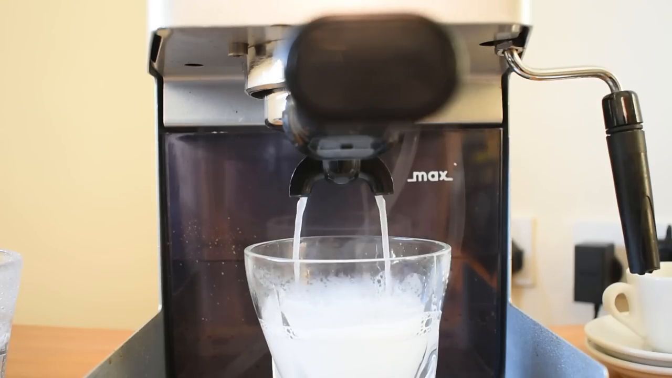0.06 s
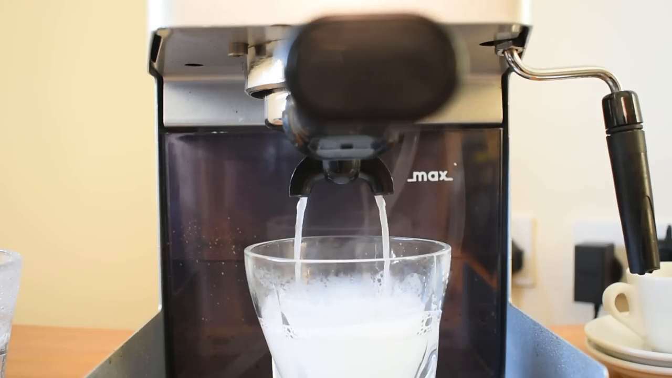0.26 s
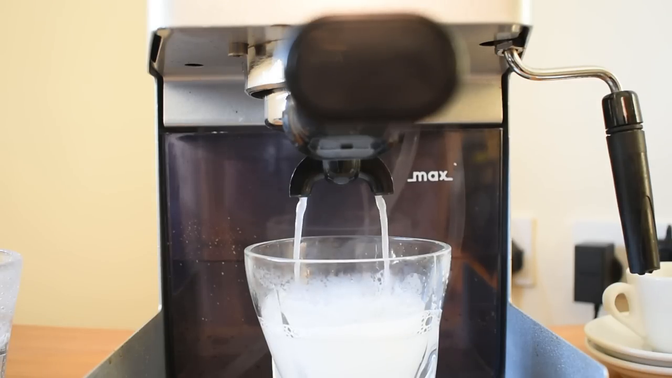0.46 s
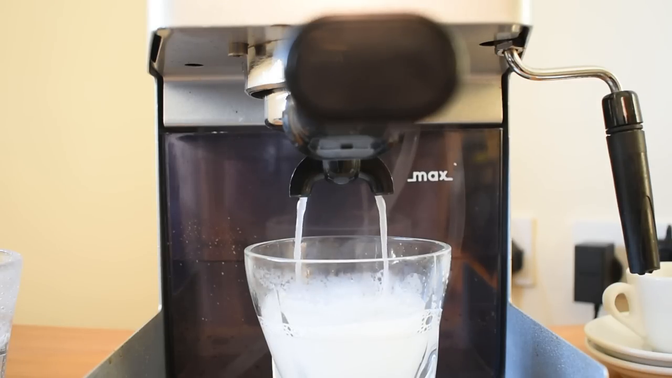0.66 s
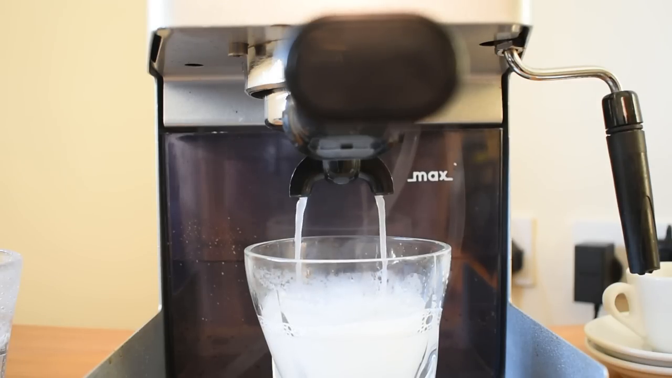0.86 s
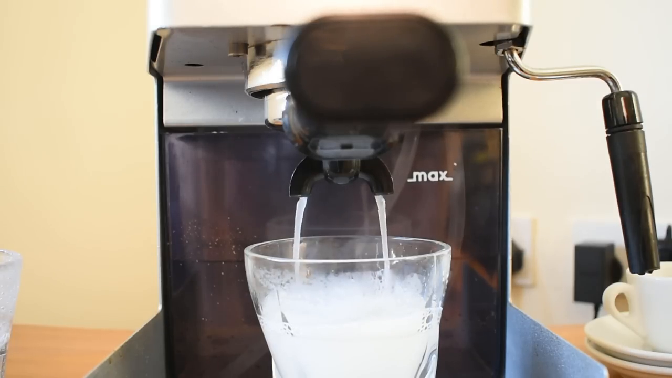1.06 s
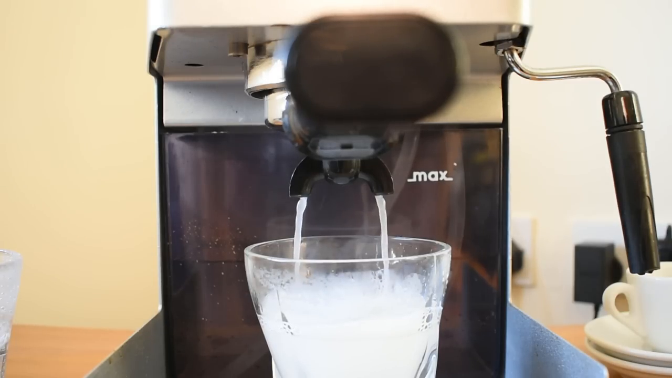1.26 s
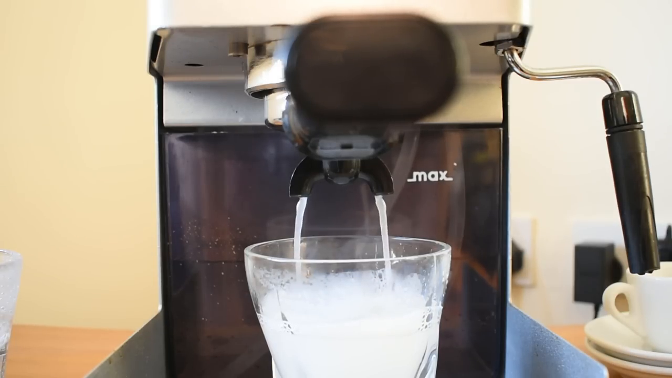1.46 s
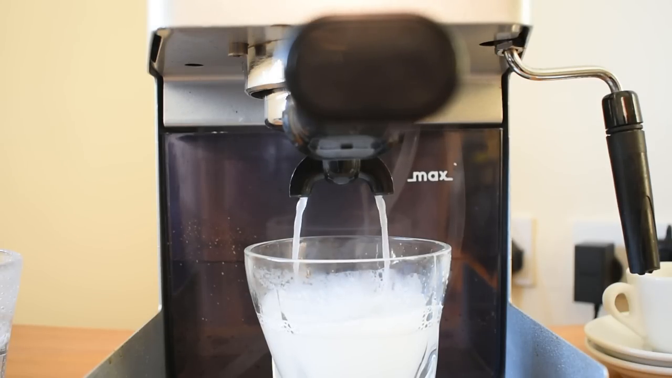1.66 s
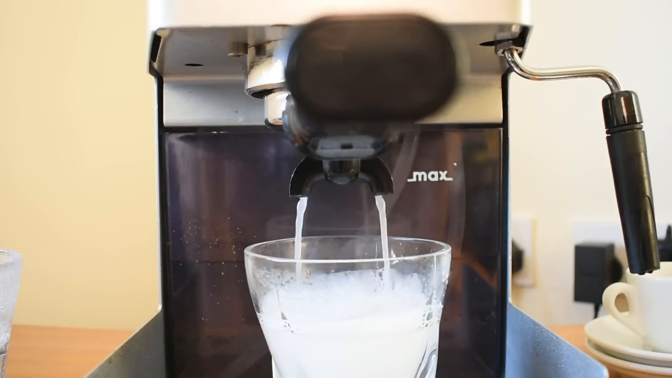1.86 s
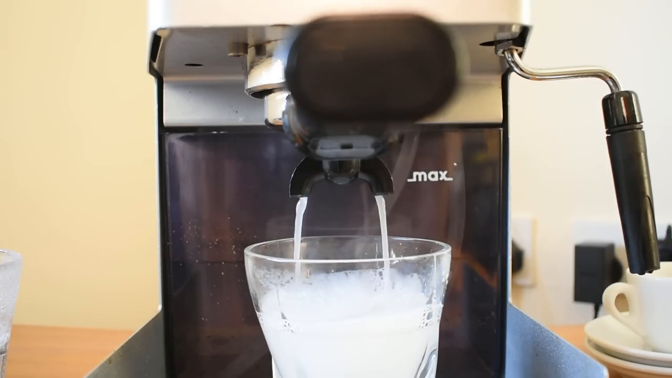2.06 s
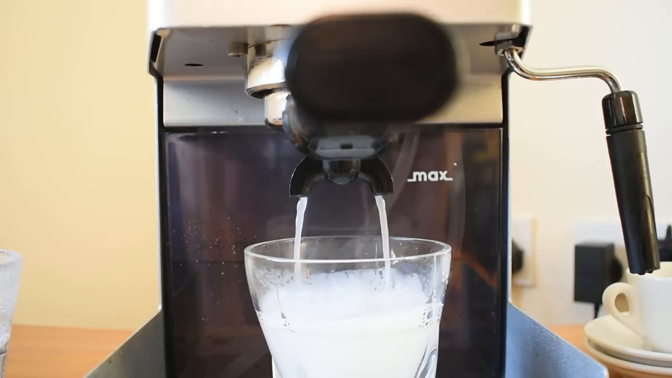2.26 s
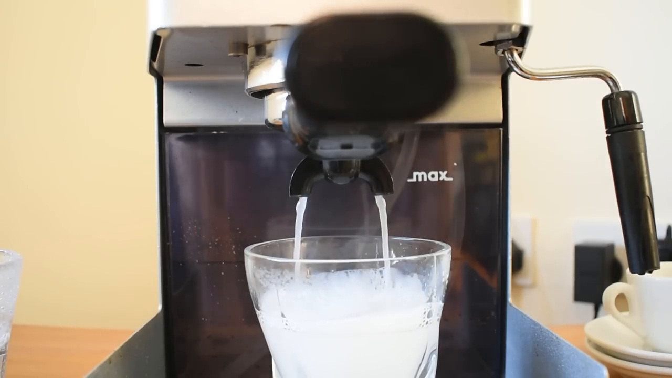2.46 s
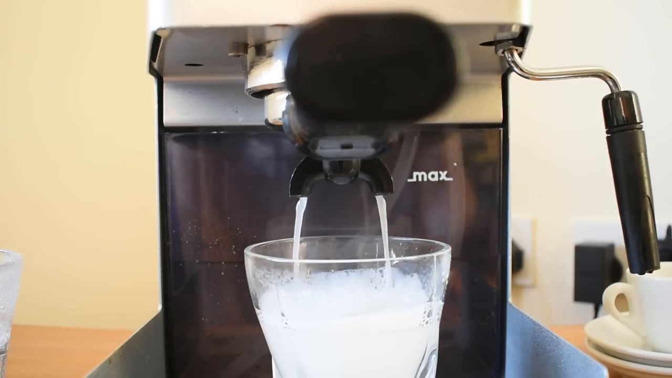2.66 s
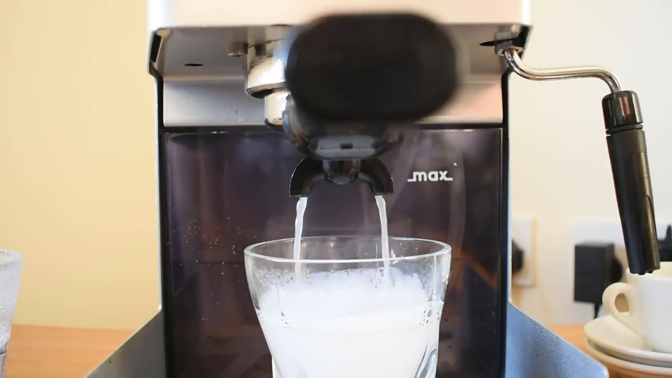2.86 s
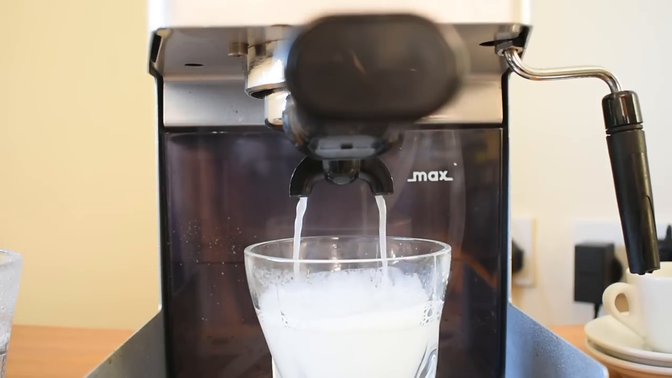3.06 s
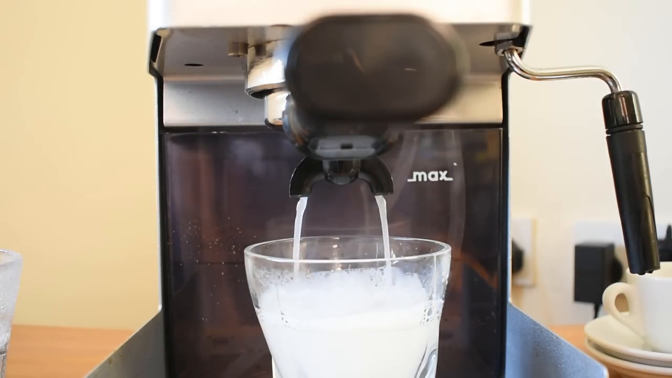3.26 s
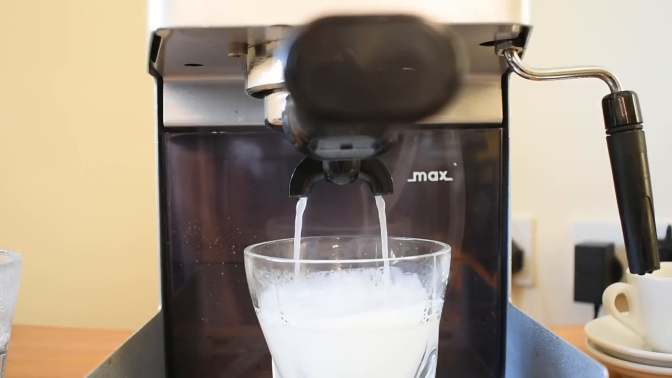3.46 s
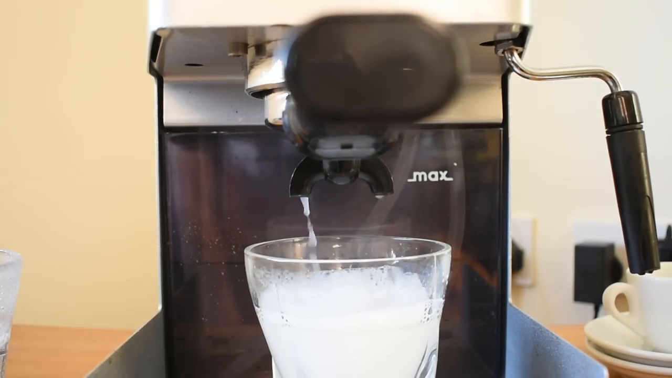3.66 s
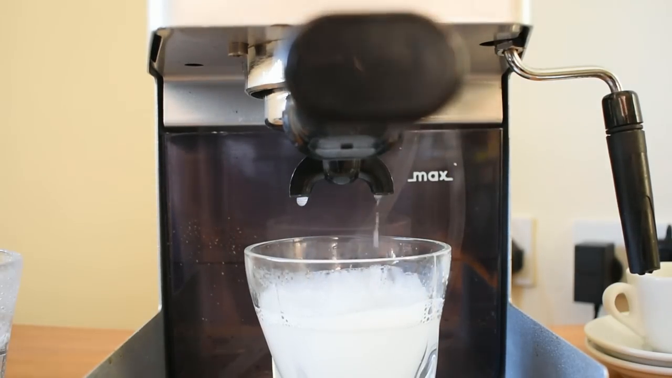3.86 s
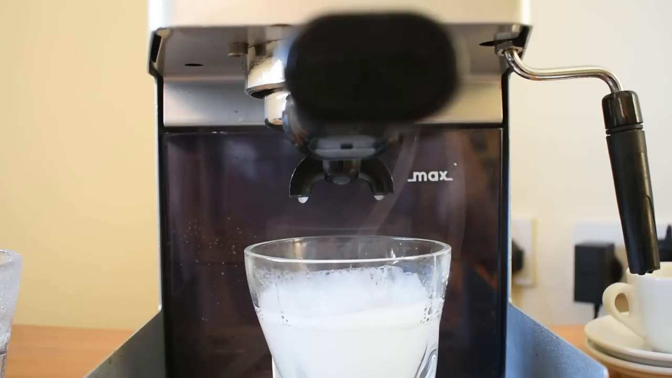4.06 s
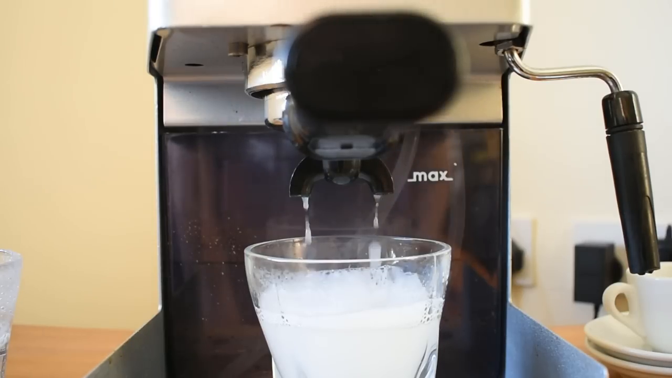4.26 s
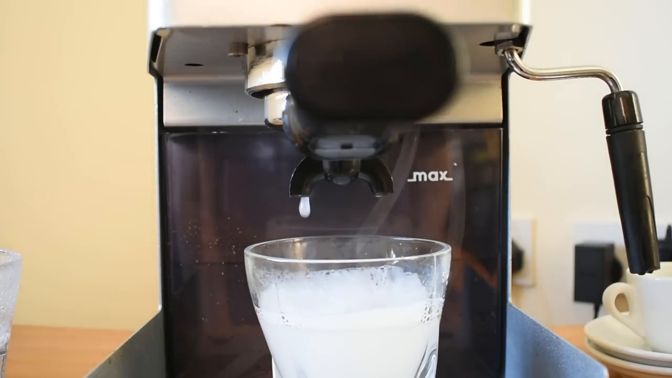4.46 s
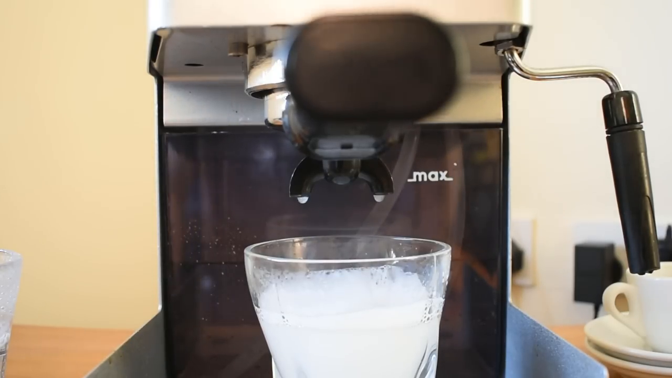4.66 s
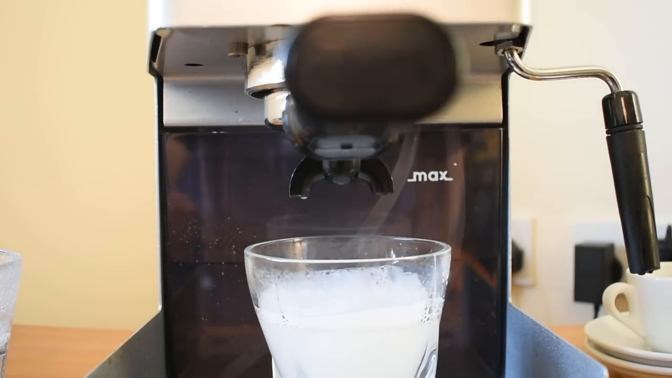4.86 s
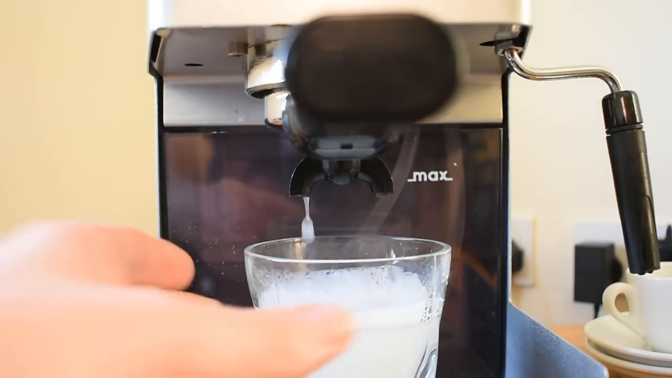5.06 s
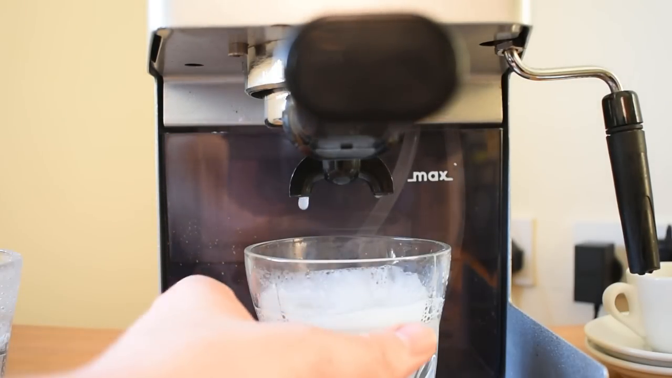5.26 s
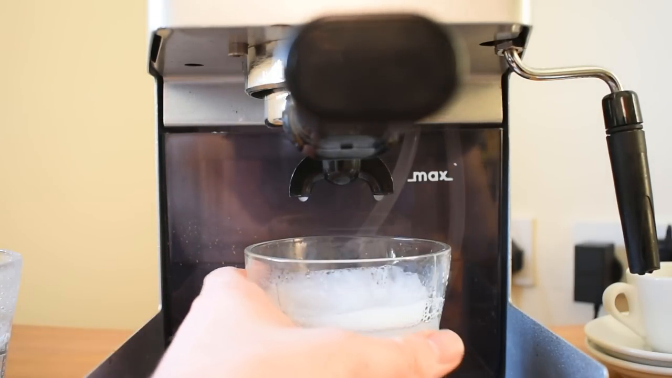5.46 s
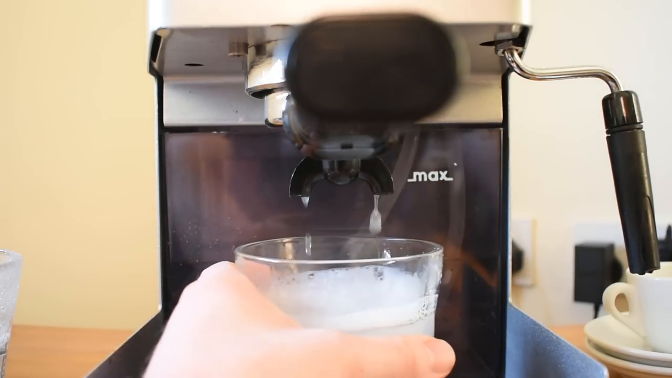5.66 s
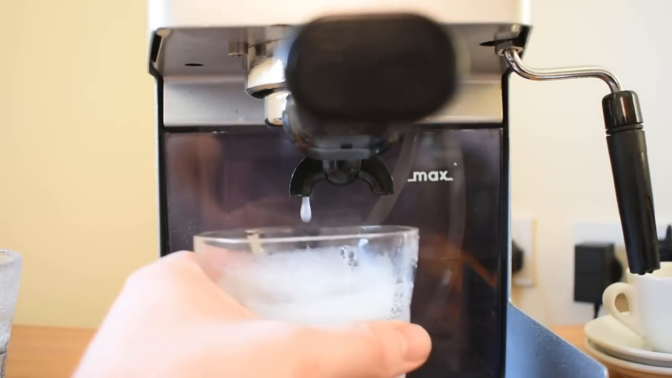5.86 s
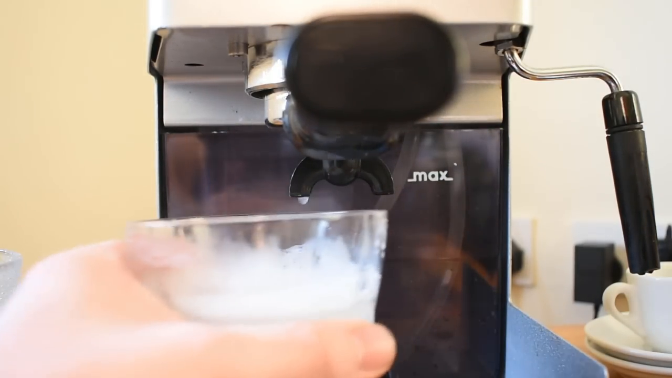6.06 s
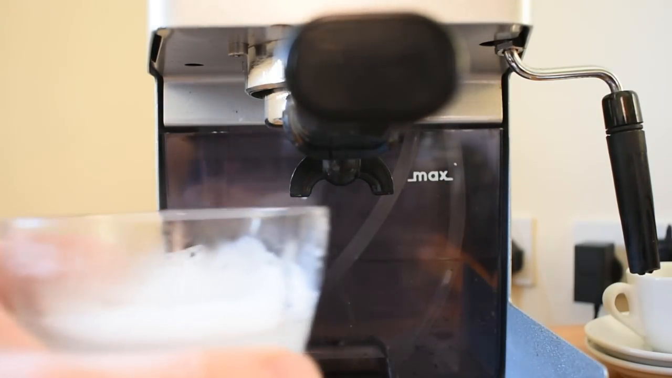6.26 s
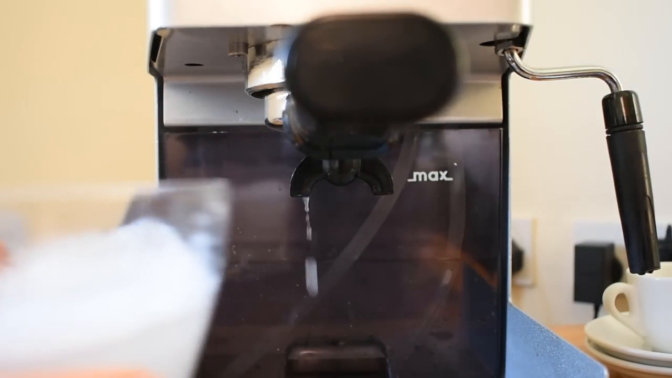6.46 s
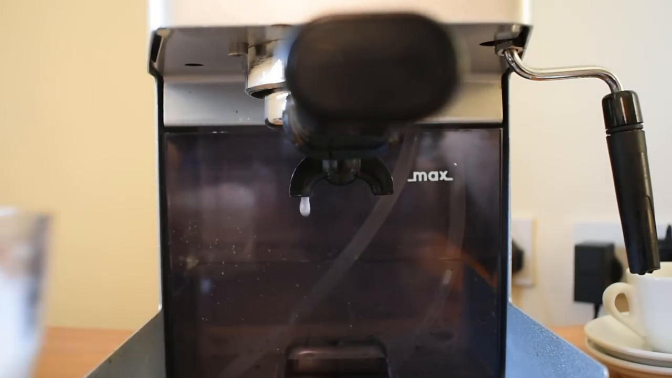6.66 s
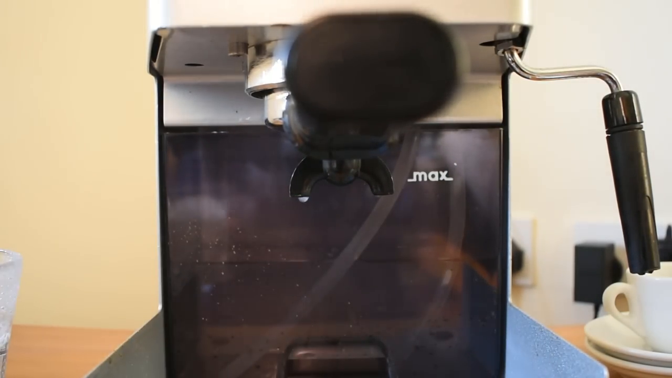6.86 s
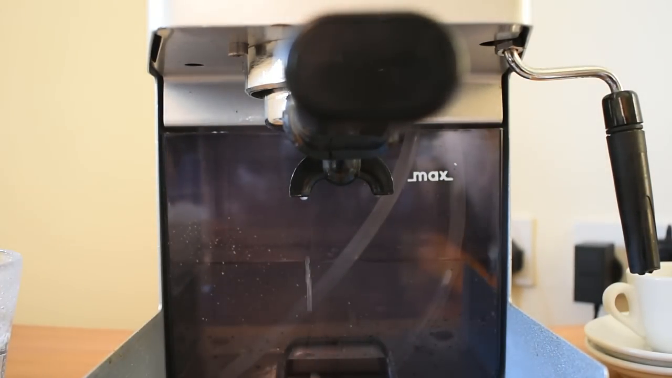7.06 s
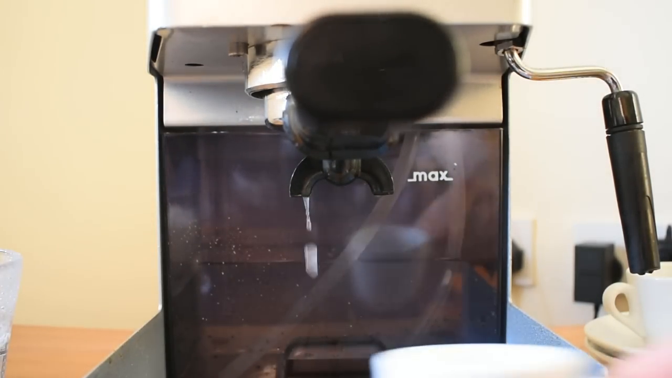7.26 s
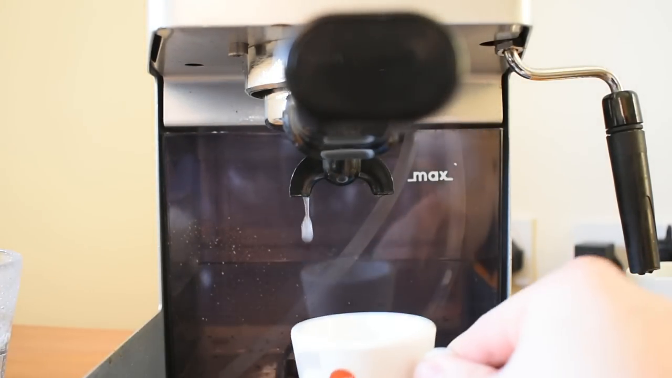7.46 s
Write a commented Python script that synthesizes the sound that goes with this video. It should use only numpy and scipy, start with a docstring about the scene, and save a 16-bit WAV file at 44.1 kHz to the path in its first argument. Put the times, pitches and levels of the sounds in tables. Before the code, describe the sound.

An espresso machine's pump runs close by in a kitchen, a steady buzz with a rattling housing and a bright, grainy hiss. About halfway through, a loud switch snap cuts it off and the room rings briefly. Over a quiet hum the spout spits once, a glass is lifted and set down with soft thuds and scrapes, and a cup ticks twice against the tray.

```python
"""An espresso machine's vibrating pump buzzes at mains rate; each piston stroke rattles the housing and sprays
a hiss. A switch snaps it off and the kitchen rings briefly. Over a quiet hum a drop falls into foam once, a
glass is lifted from the drip tray and set down on the worktop with thuds and scrapes, and a cup is brought in
with two ticks."""
import sys
import numpy as np
from scipy import signal
from scipy.fft import rfft
from scipy.io import wavfile
from scipy.ndimage import uniform_filter1d

SR = 44100
rng = np.random.default_rng(int(sys.argv[2]) if len(sys.argv) > 2 else 0)


def waveform_to_disk(signal):
    """Save audio, clipped to [-1, 1], as 16-bit WAV at the path in sys.argv[1]."""
    frames = np.transpose(np.atleast_2d(signal))
    scaled = np.clip(frames, -1, 1) * 32767
    samples = np.round(scaled).astype(np.int16)
    wavfile.write(sys.argv[1], SR, samples)


N = 331191
TIME_S = np.arange(N) / SR
MAINS_HZ, PUMP_STOP_S = 49.92, 3.5

# room air: freq_hz, gain_db
AIR_SPECTRUM = [(20, -20), (40, -10.5), (62, 0), (130, -6.5), (180, -1), (240, -6.5), (320, -3), (420, -9),
                (560, -9.5), (720, -7), (950, -8.5), (1400, -13.5), (3000, -18), (6000, -22.5),
                (10000, -26), (15700, -33)]
# mains hum: freq_hz, level_db
HUM_PARTIALS = [(100, -67.5), (200, -64)]
# kitchen reverberation: freq_hz, t60_s
KITCHEN_DECAY = [(100, 1), (400, 0.38), (1500, 0.4), (4500, 0.41), (9000, .3), (15000, 0.22)]
# wet pops: freq_hz, gain_db
POP_SPECTRUM = [(400, -12), (1200, 1), (5000, 3), (10000, -2), (15000, -7)]
# glass bumping tray and worktop: start_s, gain_db, hand_damping_t60_s
GLASS_KNOCKS = [(5.549, -44.5, .1), (5.766, -42, .1), (6.218, -48, .04), (6.338, -49, .04),
                (6.970, -39, .15), (7.046, -34.5, .8)]
# worktop under the glass: freq_hz, gain_db, t60_s
WORKTOP_MODES = [(100, -7, .15), (176, -17, 0.14), (290, -9, 0.079), (331.4, 0.5, 0.19), (378, -9, 0.071),
                 (430, -9, 0.092), (785, -17, 0.046), (895, -13, .06)]
# dull puff of a bump: freq_hz, gain_db
PUFF_SPECTRUM = [(60, -6), (400, 12), (950, 9), (2000, -8), (8000, -22)]
# glass sliding: stop_s, peak_db, length_s
GLASS_SLIDES = [(5.535, -63, .04), (5.767, -47.5, .04), (6.23, -58, .05), (7.060, -36, .048)]
# friction of its base: freq_hz, gain_db
SCRAPE_SPECTRUM = [(240, -35), (400, 2), (621, -17), (734, 0), (816, -10), (907, 2.5), (1210, -11.5),
                   (2470, -8.5), (3390, -14), (5600, -17.5), (15000, -39)]
# cup touched, then meeting the tray: start_s, gain_db
CUP_CONTACTS = [(7.461, -46), (7.502, -44)]
# cup ring: freq_hz, gain_db, t60_s
CUP_MODES = [(307, 0.5, 0.044), (1260, 3.5, 0.018), (2350, -5.5, .04), (5100, -5, 0.028), (11800, -7, .04)]
# switch snap: freq_hz, gain_db
SNAP_SPECTRUM = [(30, -45), (80, -28), (320, -9.5), (560, -7), (720, -15.5), (1000, -8), (1330, -1),
                 (1580, -10), (1850, -0.5), (2200, -4), (2780, 2), (3300, -9.5), (4300, -0.5), (5800, -4.5),
                 (8000, -8), (15700, -18)]
# bright edge of its hardest contact: freq_hz, gain_db
SLAM_SPECTRUM = [(50, -38), (500, -15), (4500, -0.5), (9000, -5), (14000, -2.5)]
# metal rung by that contact: freq_hz, gain_db, t60_s
SLAM_MODES = [(320, 2, 0.25), (548, -1, .35), (1401, -3, .2), (1900, -3, 0.2), (2043, -11.5, .15),
              (2850, -12.5, .18), (4500, -16.5, .2), (5890, -10.5, .12)]
# pump hiss: freq_hz, gain_db
HISS_SPECTRUM = [(1000, -31.5), (1500, -13.5), (1850, -2.5), (2200, -8.5), (2800, -11), (3300, -8),
                 (3600, -10), (5000, -9), (6500, -5), (8500, -5), (10500, -6), (12500, -7.5), (14500, -7.5),
                 (15700, -11.5)]
# thin metal ringing in the hiss: freq_hz, width_hz, gain_db
METAL_RESONANCES = [(2210, 90, -1.5), (3475, 79, -2), (3710, 50, 1), (4105, 63, -0.5), (4790, 100, -6),
                    (5080, 42, 0.5), (5830, 110, -3), (6320, 99, 0.5), (6950, 98, -1.5), (7410, 60, 2.5),
                    (8000, 110, -0.5), (9000, 57, 4.5), (9230, 100, 1), (9610, 90, -1), (10100, 110, -7.5),
                    (13300, 150, -5.5), (13880, 79, -4.5), (14700, 61, -10)]
# panel rattle: freq_hz, gain_db
RATTLE_SPECTRUM = [(30, -36.5), (70, -25), (120, -18.5), (250, -22), (450, -17), (800, -31.5), (1150, -17),
                   (1400, -20.5), (1650, -24), (2600, -38)]
# housing: freq_hz, width_hz, gain_db
HOUSING_RESONANCES = [(101, 21, -16), (166.3, 12, -13.5), (235, 20, -14), (284.5, 14, 1), (305.4, 28, 3),
                      (398, 50, -9.5), (470, 33, -14.5), (620, 140, -14.5), (723, 45, -14.5),
                      (825, 25, -13.5), (945, 45, -11.5), (1100, 14, -15), (1254, 45, -18), (1378, 46, -9),
                      (1481, 67, -17.5)]
# pump buzz: stroke_rate_multiple, level_db
BUZZ_HARMONICS = [(1, -53.5), (2, -47.5), (3, -48.5), (4, -39.5), (5, -51.5), (6, -38), (7, -49.5),
                  (8, -51.5), (9, -50.5), (10, -47), (12, -48), (13, -50.5), (14, -50.5), (15, -54),
                  (18, -54.5), (19, -53.5), (20, -54.5), (21, -60), (22, -52), (24, -50), (26, -55),
                  (27, -40), (29, -47.3), (30, -60), (31, -56)]
# its faint upper harmonics: freq_hz, gain_db
BUZZ_TOP_SPECTRUM = [(1600, -7), (1850, -8), (2200, 6), (2400, 1.5), (2520, 6.5), (2700, -9), (3300, -13),
                     (3480, -4.5), (4150, -6.5), (4500, -9), (6000, -25)]


def amp(db):
    """Decibels to amplitude."""
    return 10 ** (np.asarray(db) / 20)


def unit_rms(x):
    """Scale to rms 1."""
    return x / np.sqrt(np.mean(x ** 2) + 1e-20)


def smooth_noise(samples):
    """Moving average of noise, rms 1."""
    return unit_rms(uniform_filter1d(rng.standard_normal(N), size=samples))


def curve_at(points, hz):
    """Interpolate on a log-frequency axis."""
    freq_hz, values = np.transpose(points)
    return np.interp(np.log(hz + 1), np.log(freq_hz + 1), values)


def add(mix, start_s, sound):
    """Mix in a sound at start_s."""
    part = mix[round(start_s * SR):][:len(sound)]
    part += sound[:len(part)]


def colour(x, spectrum, resonances=(), size=16384):
    """Minimum-phase filter: broad spectrum plus resonances."""
    hz = abs(np.fft.fftfreq(size, 1 / SR))
    power = amp(curve_at(spectrum, hz)) ** 2
    for centre_hz, width_hz, db in resonances:
        power += (amp(db) / (1 + 2 * ((hz - centre_hz) / width_hz) ** 2)) ** 2
    log_gain = np.log(power + 1e-10) / 2
    taps = np.fft.ifft(np.exp(np.conj(signal.hilbert(log_gain)))).real[:size // 2]
    return signal.oaconvolve(x, taps)[:len(x)]


def ring(modes, spread_db=0):
    """Decaying sines of a struck body; the strike point varies their levels."""
    t = TIME_S[:SR // 2]
    return sum(amp(db + spread_db * rng.standard_normal() - 60 * t / t60_s) * np.sin(2 * np.pi * hz * t)
               for hz, db, t60_s in modes)


def burst(t60_s):
    """Decaying white noise."""
    t = TIME_S[:SR // 2]
    return rng.standard_normal(len(t)) * amp(-60 * t / t60_s)


def bounces(start_s, first_db, gap_s, step_db, gap_ratio=1, count=4):
    """A contact and its weaker repeats: start_s, gain_db."""
    k = np.arange(count)
    gaps_s = gap_s * gap_ratio ** k
    return zip(start_s + np.cumsum(gaps_s) - gaps_s, first_db + step_db * k)


def release(stop_s, t60_s):
    """Unity until stop_s, then a decay."""
    return amp(-60 * np.maximum(TIME_S - stop_s, 0) / t60_s)


def stroke_envelope(rise_s, fall_s):
    """Swell and decay once per piston stroke, peak 1."""
    age_s = TIME_S * MAINS_HZ % 1 / MAINS_HZ
    envelope = (1 - np.exp(-age_s / rise_s)) * np.exp(-age_s / fall_s)
    return envelope / envelope.max()


def background(air_db=-54.9):
    """Quiet room air and faint mains hum."""
    air = amp(air_db) * unit_rms(colour(rng.standard_normal(N), AIR_SPECTRUM))
    hum = sum(amp(db) * np.sqrt(2) * np.sin(2 * np.pi * (hz * TIME_S + rng.random()))
              for hz, db in HUM_PARTIALS)
    return air + hum


def kitchen_reverb(x, delay_s=.004, rise_s=.0027):
    """Dense reflections, each band decaying at its own rate."""
    reflections = rng.standard_normal(SR) * np.clip((TIME_S[:SR] - delay_s) / rise_s, 0, 1)
    hz, t, bands = signal.stft(reflections, SR, nperseg=256)
    decay = amp(-60 * t / curve_at(KITCHEN_DECAY, hz)[:, None])
    tail = signal.istft(bands * decay, SR, nperseg=256)[1]
    return signal.fftconvolve(x, tail / np.linalg.norm(tail))[:N]


def foam_drip():
    """A drop lands in foam: a quick cluster of tiny wet pops."""
    pops = np.zeros(N)
    for start_s, db in bounces(start_s=4.49, first_db=-42, gap_s=.004, step_db=-1.5):
        add(pops, start_s, amp(db) * burst(t60_s=.006))
    pops = colour(pops, POP_SPECTRUM)
    return pops + kitchen_reverb(pops)


def glass_thuds(puff_db=-9):
    """Each bump gives a dull puff; the glass rocks on its base and rings the worktop."""
    thuds, puffs = np.zeros(N), np.zeros(N)
    for start_s, first_db, damping_t60_s in GLASS_KNOCKS:
        thud = ring(WORKTOP_MODES) * amp(-60 * TIME_S[:SR // 2] / damping_t60_s)
        for rock_s, db in bounces(start_s, first_db, gap_s=.0213, step_db=-5):
            add(thuds, rock_s, amp(db) * thud)
        add(puffs, start_s, amp(first_db + puff_db) * burst(t60_s=.05))
    return thuds + colour(puffs, PUFF_SPECTRUM)


def glass_scrapes(grit_db=2):
    """The base slides over fine grit, ever harder until it stops."""
    envelope = np.zeros(N)
    for stop_s, peak_db, length_s in GLASS_SLIDES:
        pressure = np.clip(1 + (TIME_S - stop_s) / length_s, 0, 1)
        envelope += amp(peak_db) * pressure * release(stop_s, t60_s=.05)
    friction = amp(grit_db * smooth_noise(samples=40)) * rng.standard_normal(N)
    return envelope * unit_rms(colour(friction, SCRAPE_SPECTRUM))


def cup_ticks():
    """The cup chatters and rings briefly at each contact."""
    ticks = np.zeros(N)
    for start_s, first_db in CUP_CONTACTS:
        for tick_s, db in bounces(start_s, first_db, gap_s=.004, step_db=-3, count=2):
            add(ticks, tick_s, amp(db) * ring(CUP_MODES, spread_db=1.5))
    return ticks


def crockery(low_cut_hz=110, knock_room_db=-14, scrape_room_db=-7):
    """Glass and cup in the room; small surfaces radiate little deep bass."""
    low_cut = signal.butter(2, low_cut_hz, "high", fs=SR, output="sos")
    knocks = signal.sosfilt(low_cut, glass_thuds() + cup_ticks())
    scrapes = glass_scrapes()
    return knocks + scrapes + kitchen_reverb(amp(knock_room_db) * knocks + amp(scrape_room_db) * scrapes)


def switch_snap(trip_s=3.5136, trip_db=-4, slam_s=3.5152, room_db=-10):
    """The switch trips, slams home and bounces, shaking the case; the slam rings the metal."""
    contacts = bounces(slam_s, first_db=4.5, gap_s=.0036, step_db=-5.5, gap_ratio=.85)
    cracks, slam = np.zeros(N), np.zeros(N)
    for start_s, db in [(trip_s, trip_db), *contacts]:
        crack = amp(-9) * burst(t60_s=.025)
        case = amp(-16) * burst(t60_s=.055)
        add(cracks, start_s, amp(db) * (crack + case))
    edge = amp(-1) * colour(burst(t60_s=.0088), SLAM_SPECTRUM)
    add(slam, slam_s, edge + amp(-34) * ring(SLAM_MODES))
    snap = unit_rms(colour(cracks, SNAP_SPECTRUM)) * np.std(cracks) + slam
    return snap + amp(room_db) * kitchen_reverb(snap)


def pump_hiss(level_db=-32.5, floor=.49, stroke_spread_db=2, grain_db=1):
    """Each stroke throws a grainy burst of hiss that rings the thin metal."""
    stroke_index = (TIME_S * MAINS_HZ).astype(int)
    strength = amp(stroke_spread_db * rng.standard_normal(N)[stroke_index])
    grain = amp(grain_db * smooth_noise(samples=30))
    envelope = floor + strength * stroke_envelope(rise_s=.0046, fall_s=.0079)
    hiss = colour(rng.standard_normal(N) * envelope * grain, HISS_SPECTRUM, METAL_RESONANCES)
    return amp(level_db) * unit_rms(hiss) * release(PUMP_STOP_S, t60_s=.15)


def housing_rattle(level_db=-33.5, memory=.62, floor=.35):
    """Loose panels bounce with the piston in an unsteady pattern about three strokes long."""
    stroke_samples = round(SR / MAINS_HZ)
    strokes = rng.standard_normal((N // stroke_samples + 1, stroke_samples))
    chatter = signal.lfilter([1], [1, memory, memory ** 2], strokes, axis=0).ravel()[:N]
    envelope = floor + stroke_envelope(rise_s=.0012, fall_s=.007)
    panels = colour(chatter * envelope, RATTLE_SPECTRUM, HOUSING_RESONANCES)
    return amp(level_db) * unit_rms(panels) * release(PUMP_STOP_S, t60_s=.41)


def pump_buzz(top_db=-48, waver=.096):
    """The piston's blow repeats at mains rate: harmonics phased like one short ring of the body."""
    blow_spectrum = rfft(burst(t60_s=.11), SR)  # 1 Hz bins
    cycle_pos = np.arange(4096) / 4096

    def cycle(orders, db):
        phase_rad = np.angle(blow_spectrum[np.round(orders * MAINS_HZ).astype(int)])
        partials = np.cos(2 * np.pi * orders[:, None] * cycle_pos + phase_rad[:, None])
        return np.sqrt(2) * amp(db) @ partials

    low_orders, low_db = np.transpose(BUZZ_HARMONICS)
    top_orders = np.arange(low_orders[-1] + 1, 100)
    top = cycle(top_orders, curve_at(BUZZ_TOP_SPECTRUM, top_orders * MAINS_HZ))
    stroke = cycle(low_orders, low_db) + amp(top_db) * unit_rms(top)
    buzz = np.interp(TIME_S * MAINS_HZ % 1, cycle_pos, stroke)
    force = 1 + waver * smooth_noise(samples=2000)
    return buzz * force * release(PUMP_STOP_S, t60_s=.2)


def scene():
    """All sources, mono."""
    pump = pump_buzz() + housing_rattle() + pump_hiss()
    return (pump + switch_snap() + crockery() + foam_drip() + background())[None]


def record(dry, low_cut_hz=20, band_limit_hz=15800):
    """Microphone bass roll-off, input clipping on the snap, band limit."""
    low_cut = signal.butter(1, low_cut_hz, "high", fs=SR)
    clipped = np.clip(signal.lfilter(*low_cut, dry), -1, 1)
    low_pass = signal.firwin(511, band_limit_hz, window=("kaiser", 9), fs=SR)
    return signal.oaconvolve(clipped, low_pass[None], "same")


dry = scene()
out = record(dry)
waveform_to_disk(out)
```